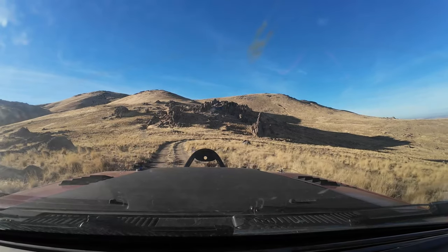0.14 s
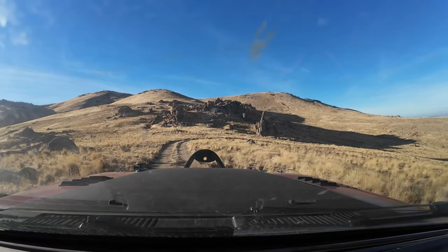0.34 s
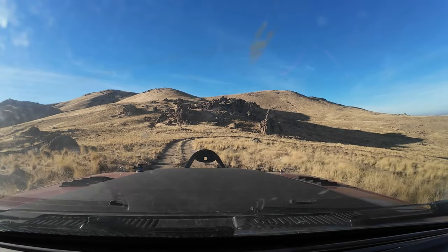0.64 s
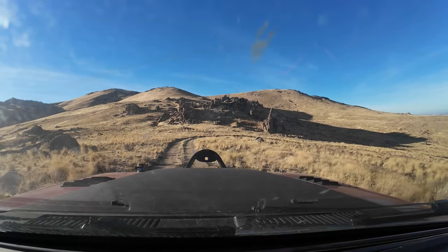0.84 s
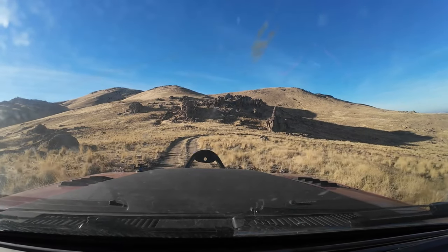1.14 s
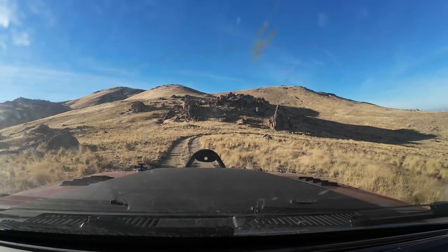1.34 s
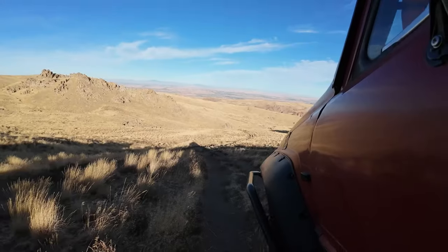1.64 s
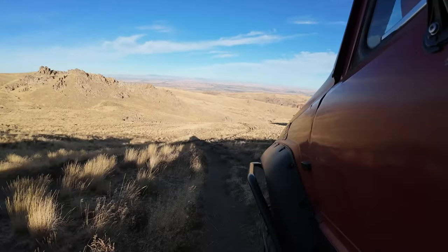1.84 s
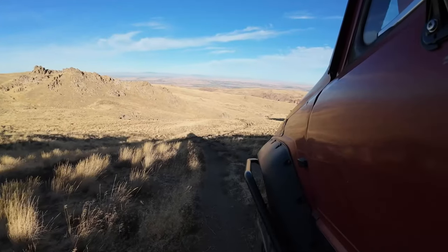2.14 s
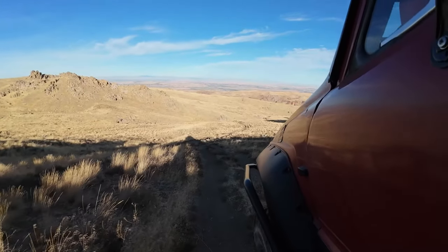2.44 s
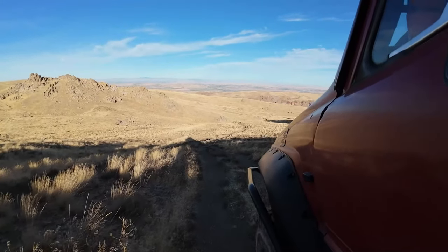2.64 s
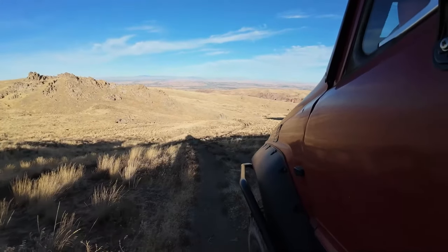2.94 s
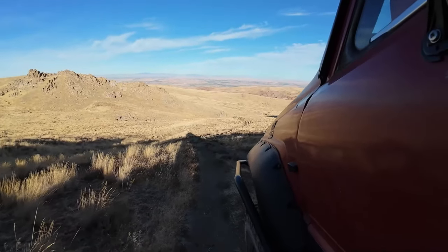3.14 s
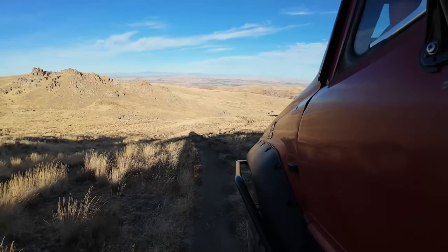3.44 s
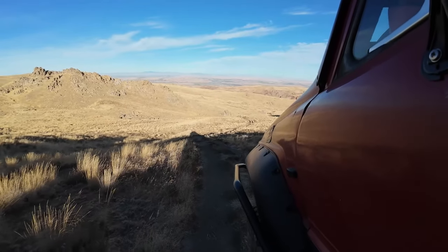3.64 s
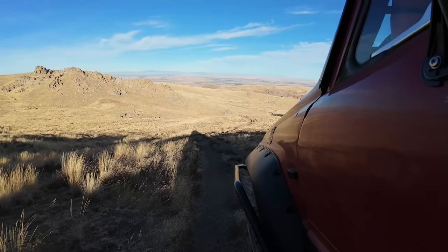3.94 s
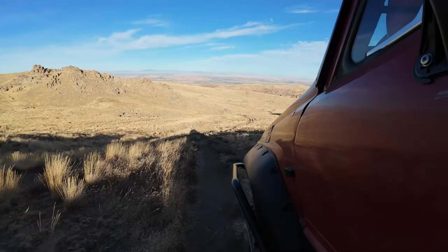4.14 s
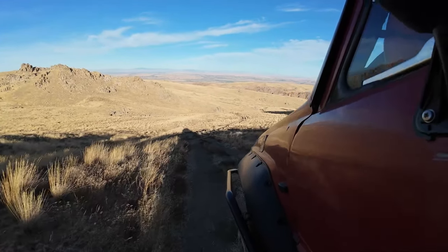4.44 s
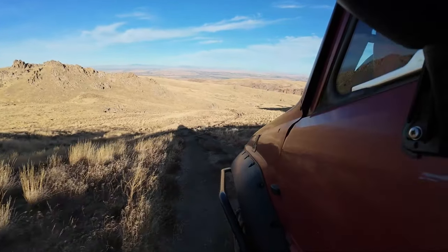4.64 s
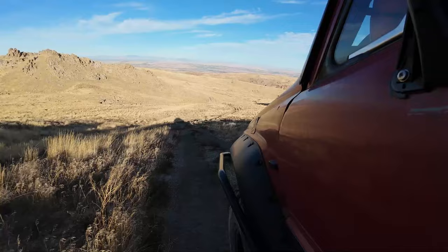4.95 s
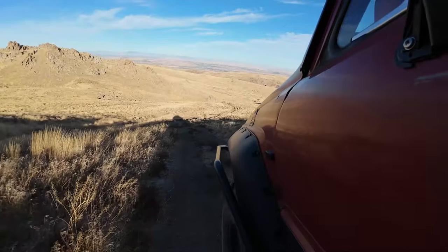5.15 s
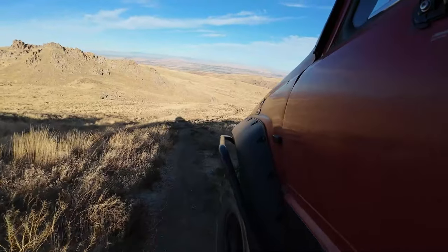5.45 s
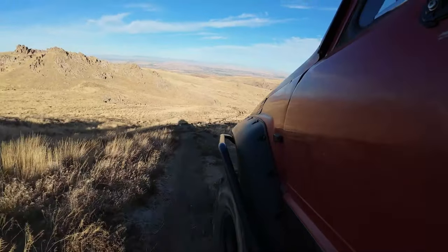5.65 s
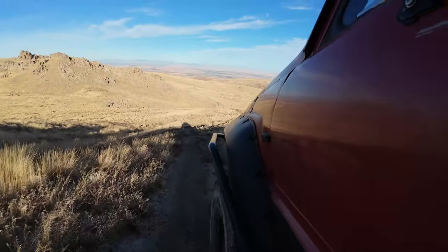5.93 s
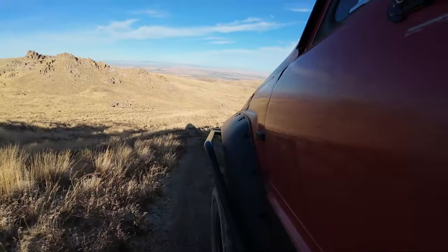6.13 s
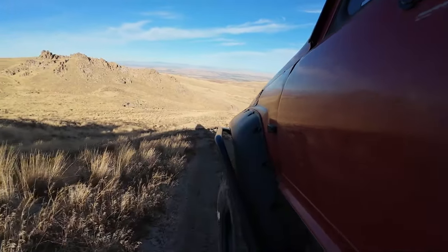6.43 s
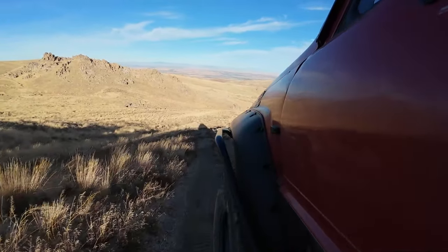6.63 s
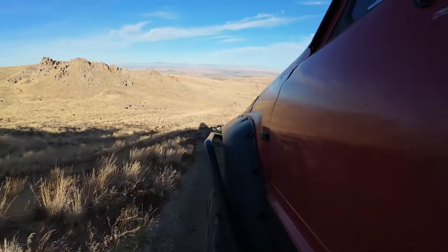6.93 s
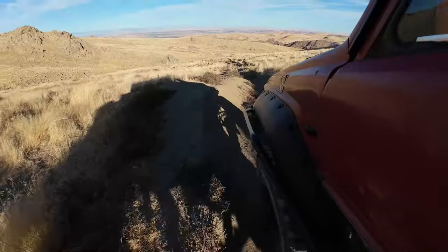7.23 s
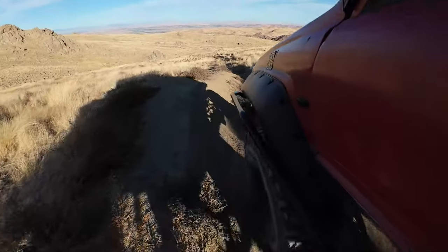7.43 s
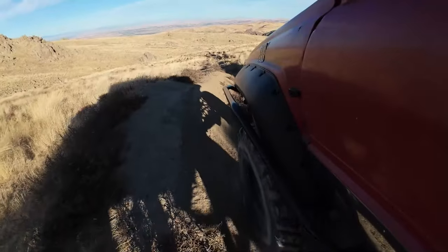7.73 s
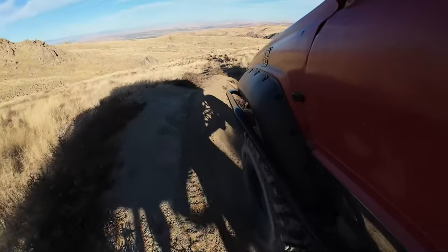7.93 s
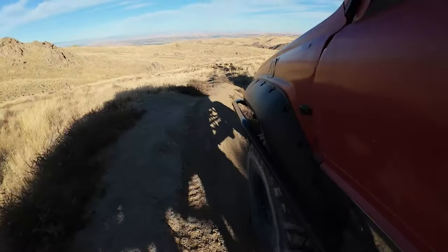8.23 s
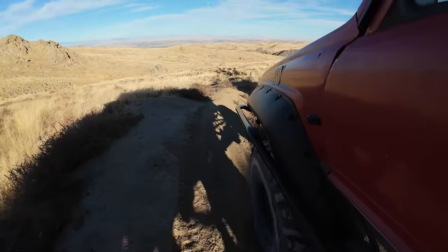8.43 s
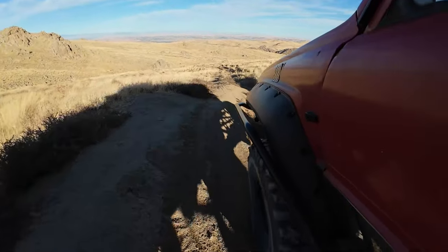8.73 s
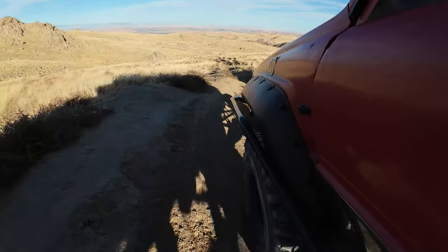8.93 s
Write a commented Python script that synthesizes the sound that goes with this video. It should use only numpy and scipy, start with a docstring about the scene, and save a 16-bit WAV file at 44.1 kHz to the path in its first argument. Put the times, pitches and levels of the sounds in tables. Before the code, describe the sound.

A truck crawls over a dry grassy trail. First a boomy, muffled cab with faint rattling trim, then a sudden open-air view close to the front wheel. Wind flurries roar and slap the microphone, mostly on the left, over low engine hum, whining gears and crunching dirt. The brake squeaks thinly, grass brushes the side, a stone cracks against the body, and the crunch finally grows brighter.

```python
"""First a cab booms at the firing rate of a pickup crawling along a dirt trail, over rumble and hiss, as loose trim ticks.
Then, in two spells outside the door, engine, gears and a low window throb sound as fluttering sinusoids, the engine bay
as throbbing noise. Tyres crunch in clumped noise and snaps; wind is noise in flurries and gusts, with single pressure
pulses at two ports. A brake chirps on one note, dry stalks scrape in sprays of snaps, and stones crack as short bursts
of noise."""
import sys
import numpy as np
from scipy import signal
from scipy.fft import rfft, irfft, next_fast_len
from scipy.io import wavfile
from scipy.ndimage import uniform_filter1d, minimum_filter1d, map_coordinates

SR = 44100
rng = np.random.default_rng(int(sys.argv[2]) if len(sys.argv) > 2 else 0)


def file_out(sig):
    """Save sig as 16-bit WAV at sys.argv[1]."""
    # one column per channel
    cols = np.atleast_2d(sig).T
    # limit, then scale
    lim = np.clip(cols, -1, 1)
    pcm = np.round(lim * 32767).astype(np.int16)
    wavfile.write(sys.argv[1], SR, pcm)


N = 400428


def amp(db):
    """Level: decibels to a pressure ratio."""
    return 10 ** (np.asarray(db) / 20)


def unit(x):
    """Normalisation: scale to rms 1."""
    return x / np.sqrt(np.mean(x ** 2) + 1e-20)


def along(points, hz):
    """Logarithmic frequency: interpolate (f, value) points on a log axis."""
    f, value = np.transpose(points)
    return np.interp(np.log(hz + 1), np.log(f + 1), value)


def curves(rows):
    """Slow variation: one value per sample for each column after the time."""
    s, *columns = np.transpose(rows)
    t = np.arange(N) / SR
    return [np.interp(t, s, column) for column in columns]


def wobble(rate):
    """Random fluctuation: a smooth curve through rate random knots a second."""
    knots = rng.standard_normal(int(N * rate / SR) + 4)
    return map_coordinates(knots, [np.arange(N) * rate / SR])


def filtered(x, response):
    """Linear filtering: multiply the spectrum by a response of frequency."""
    m = next_fast_len(N + SR // 2)
    spectrum = rfft(x, m) * response(np.fft.rfftfreq(m, 1 / SR))
    return irfft(spectrum, m)[..., :N]


def white():
    """Incoherence: two unrelated white noises."""
    return rng.standard_normal((2, N))


# likeness of the left and right microphone ports: (f/Hz, correlation)
PORT_LIKENESS = [(100, .97), (1000, .99), (3000, .94), (5000, .82), (7000, .45), (9500, .3), (11000, -.1),
                 (13000, 0), (15000, -.5)]


def coloured(pair, spectrum, alike=PORT_LIKENESS):
    """Partial coherence: mix two unrelated signals to a stereo sound of rms 1, given spectrum and correlation."""
    def gains(hz):
        turn = np.arccos(np.clip(along(alike, hz), -1, 1)) / 2
        return amp(along(spectrum, hz)) * [np.cos(turn), np.sin(turn)]
    mid, side = filtered(pair, gains)
    return unit(np.array([mid + side, mid - side]))


def bursts(rows, attack):
    """Exponential decay: envelope of (s, dB, t60) blows that swell with time constant attack and die away."""
    env, t = np.zeros(N + SR), np.arange(SR // 2) / SR
    for s, db, t60 in rows:
        env[round(s * SR):][:len(t)] += amp(db - 60 * t / t60) * (1 - np.exp(-t / attack))
    return env[:N]


def swells(rows, shape):
    """Superposition: stereo sum of (s, dB, L-R dB, ...) events, each shape(t, ...) centred on its time."""
    out, t = np.zeros((2, N + SR)), np.arange(-SR // 10, SR // 10) / SR
    for s, db, side_db, *rest in rows:
        gains = amp(db + side_db * np.array([[.5], [-.5]]))
        out[:, round((s + t[0]) * SR):][:, :len(t)] += gains * shape(t, *rest)
    return out[:, :N]


def spell(start, length, edge):
    """Gating: an envelope that rises, holds for the length and falls, with soft edges."""
    t = np.arange(N) / SR - start
    return (np.tanh(t / edge) - np.tanh((t - length) / edge)) / 2


def during(spans, edge):
    """Gating: 1 while one of the (start, end) spans runs."""
    return sum(spell(a, b - a, edge) for a, b in spans)


def angle(hz):
    """Frequency modulation: the running phase of a frequency curve."""
    return 2 * np.pi * np.cumsum(hz) / SR


def partial(phase, rough, rate):
    """Narrow-band modulation: a tone of rms 1 that flutters randomly in level and phase."""
    in_phase = (1 + rough * wobble(rate)) * np.sin(phase)
    return unit(in_phase + rough * wobble(rate) * np.cos(phase))


def orders(firing, table, rough, rate):
    """Additive synthesis: tones at multiples of the firing rate, summed to rms 1."""
    return unit(sum(amp(db) * partial(k * firing, rough, rate) for k, db in table))


def peaks(table, hz):
    """Resonance: gain in dB of (f, width, dB) peaks."""
    return sum(db / (1 + (2 * (hz - centre) / width) ** 2) for centre, width, db in table)


def grains(rate, spread_db):
    """Impulsive noise: sparse random snaps of very unequal size, at rms 1."""
    sizes = amp(spread_db * np.minimum(rng.exponential(size=N), 4))
    return unit((rng.random(N) < rate / SR) * sizes * white())


def patchy(pair, depth_db):
    """Spectro-temporal modulation: random gain patches a few hundred Hz wide and some tens of ms long."""
    z = signal.stft(pair, nperseg=512)[2]
    across_hz = uniform_filter1d(rng.standard_normal(z.shape[1:]), size=5, axis=0)
    field = uniform_filter1d(across_hz, size=9, axis=1)
    return signal.istft(z * amp(depth_db * unit(field)), nperseg=512)[1][:, :N]


# boom at the firing rate, and engine effort as the level of its overtones: (t/s, boom level/dB, effort level/dB)
CAB_LEVELS = [(0, 4.5, -17.5), (.35, -7.5, -29.5), (.55, -6.5, -28.5), (.8, -2, -20.5), (1, -9, -27),
              (1.15, -2, -21.5), (1.3, -12, -29.5), (1.5, -7, -21), (1.61, -8, -18.5)]
# tones in the cab, where 4.75 stands for a cab resonance near 287 Hz: (multiple of firing rate, relative level/dB)
CAB_TONES = [(2, 0), (3, -10), (4, -15), (4.75, -14), (6, -11), (7, -23), (10, -27)]
# air resonances of the cab, which the tones slide through: (f/Hz, width/Hz, gain/dB)
CAB_MODES = [(284, 12, 4), (417, 14, 10)]
# spectra of the drumming panels, road rumble and hiss: (f/Hz, relative density/dB)
PANEL_SPECTRUM = [(90, -9), (170, 5.5), (260, 2.5), (320, 6), (390, -7.5), (450, -15.5), (800, -47)]
ROAD_SPECTRUM = [(10, -40.5), (21, 7), (27, 24), (35, 12), (46, -17.5), (85, -7), (130, -13.5),
                 (215, -25.5), (275, -22.5), (380, -23), (520, -36), (900, -41.5), (2000, -81.5)]
CAB_HISS_SPECTRUM = [(250, -3), (500, 8), (800, 1), (1200, -4.5), (2000, -12.5), (2700, -15.5),
                     (4400, -24.5), (5300, -33), (8500, -43), (10500, -42), (12000, -60), (15000, -63)]
# level of the hiss in the cab: (t/s, level/dB)
CAB_HISS_LEVEL = [(0, -38.5), (.23, -38), (.28, -45), (.4, -41), (.58, -46.5), (.73, -37), (.81, -38),
                  (.87, -37), (1.05, -48), (1.14, -36.5), (1.3, -46), (1.43, -43.5), (1.52, -42),
                  (1.61, -40.5)]
ROAD_DB, PANELS_DB = -9.5, -11  # road rumble; panels relative to the effort curve


def cab(firing):
    """Cavity resonance: air modes colour the overtones, which grow with effort as panels do, by boom, rumble and hiss."""
    boom_db, effort_db = curves(CAB_LEVELS)
    boom = amp(boom_db) * unit(np.sin(firing) * (1 + .11 * wobble(25)))
    tones = orders(firing, CAB_TONES, rough=.3, rate=11)
    overtones = filtered(tones, lambda hz: amp(peaks(CAB_MODES, hz)))
    panels = amp(PANELS_DB) * coloured(white(), PANEL_SPECTRUM)
    road = amp(ROAD_DB) * coloured(white(), ROAD_SPECTRUM, [(25, 0.42), (60, 0.83), (300, 0.86)])
    hiss = amp(curves(CAB_HISS_LEVEL)[0]) * coloured(white(), CAB_HISS_SPECTRUM)
    return boom + amp(effort_db) * (amp(-2.0) * overtones + panels) + road + hiss


# ticks of loose trim: (t/s, relative level/dB)
TICKS = [(0.112, -28), (0.228, -26.5), (0.37, -28), (0.491, -29.5), (0.5673, -48), (0.683, -42.5),
         (0.7742, -35), (0.81, -37.5), (0.926, -30), (0.964, -42.5), (1.2782, -50), (1.318, -44.5),
         (1.454, -47), (1.529, -30.5), (1.539, -40.5), (1.5748, -36.5)]
# ring of the trim: (f/Hz, relative level/dB, t60/s)
TRIM_MODES = [(2760, -12.5, 0.036), (3520, -11, 0.051), (4370, -11, .035), (4600, -5, 0.029),
              (6430, -18, 0.043), (10500, -18.5, 0.03)]
# spells of chatter: (start t/s, length/s, relative level/dB)
RATTLES = [(0.628, 0.17, -59), (0.774, 0.26, -75.5)]
# spectrum of the trim's noise: (f/Hz, relative density/dB)
TRIM_SPECTRUM = [(1500, -32), (3000, -7.5), (3800, -8), (4650, -10.5), (5200, -17), (7000, -14),
                 (8800, -27), (10600, -10.5), (12000, -30.5), (15000, -32)]
CHATTER_DB, RATTLE_EDGE_S = -77, .03  # chatter at rest, before its flutter; rise and fall of a rattle


def trim():
    """Modal excitation: loose plastic chatters and ticks, each tick rings its modes, and the cab answers briefly."""
    t = np.arange(N) / SR
    tick = bursts([(s, db, .013) for s, db in TICKS], attack=.0005)
    ring = 0
    for hz, level, t60 in TRIM_MODES:
        # each tick excites each mode a little differently
        blows = [(s, db + level + rng.standard_normal(), t60) for s, db in TICKS]
        ring = ring + bursts(blows, attack=0.00027) * np.sin(2 * np.pi * hz * t)
    answer = bursts([(s, db, .06) for s, db in TICKS], attack=.0018)
    rattles = sum(amp(db) * spell(s, length, RATTLE_EDGE_S) for s, length, db in RATTLES)
    chatter = (amp(CHATTER_DB) + rattles) * amp(2.3 * wobble(70))
    noise_level = amp(-4) * tick + amp(-23.5) * answer + chatter
    return amp(-4) * ring + noise_level * coloured(white(), TRIM_SPECTRUM)


# low throb and engine outside: (t/s, low throb level/dB, sixth-order hum level/dB, other orders level/dB)
DRONE = [(1.64, -24, -38.5, -37.5), (2.3, -19.5, -37.5, -33.5), (2.75, -34, -41, -31),
         (5.8, -34.5, -38, -31), (7.26, -30, -35.5, -31), (7.3, -32, -32.5, -33), (7.6, -31, -37, -30.5),
         (8.2, -41.5, -34.5, -50.5), (8.55, -39.5, -31.5, -35), (9.08, -41, -34, -32.5)]


def window_throb(firing):
    """Cavity buffeting: a throb at 18 Hz and its harmonics, as of air buffeting an open window, by a weak firing tone."""
    throb_db = curves(DRONE)[0]
    # as multiples of the firing rate: near 18, 36 and 54 Hz, then the firing rate itself
    tones = [(.308, 4), (.616, 4), (.924, 7), (1, -10)]
    return amp(throb_db) * orders(firing, tones, rough=0.26, rate=12)


# level of tyre crunch, dipping briefly under the hardest gusts: (t/s, relative level/dB)
ROLLING = [(1.64, -45), (2.8, -43.5), (3.14, -46), (3.36, -50), (3.53, -44.5), (4.9, -43), (5.6, -41),
           (6.3, -42), (7.26, -42.5), (7.29, -37), (7.9, -38), (8.35, -40), (9.08, -37)]


def crunch_excess():
    """Relative level: how far the crunch level lies above its mean, in dB."""
    crunch_db, = curves(ROLLING)
    return crunch_db - crunch_db.mean()


# engine orders outside: (multiple of the firing rate, relative level/dB)
DOOR_ORDERS = [(2, 0), (2.5, -10), (4.33, -12), (4.9, -9), (5.65, -14), (10.5, -10), (15.2, -17),
               (18.75, -22)]
# the engine pulls harder: (start t/s, length/s, extra engine bay level/dB)
SURGES = [(7.276, 0.18, 3), (7.503, 0.49, 1.5)]
# spectrum of the engine bay: (f/Hz, relative density/dB)
BAY_SPECTRUM = [(60, 9.5), (130, 7.5), (190, -3.5), (270, 2.5), (350, 0), (440, -4.5), (520, -1),
                (592, 1.5), (700, 1), (770, -7.5), (890, 1), (1000, -4.5), (1150, -5.5), (1450, -11),
                (2500, -39.5)]
BAY_DB, BAY_FOLLOWS = -28.5, 0.49  # engine bay at mean crunch outside the surges; its dB for each dB of crunch
SURGE_EDGE_S = 0.031
# the exhaust resonates briefly at twice the firing rate
PIPE_START_S, PIPE_LENGTH_S, PIPE_EDGE_S, PIPE_DB = 8.38, .26, 0.034, -26


def engine(firing):
    """Periodic excitation: engine orders and a pipe resonance, with engine bay noise throbbing at each firing."""
    _, hum_db, tones_db = curves(DRONE)
    surge_db = sum(db * spell(s, length, SURGE_EDGE_S) for s, length, db in SURGES)
    bay_db = BAY_DB + BAY_FOLLOWS * crunch_excess() + surge_db
    hum = amp(hum_db) * partial(6 * firing, rough=.15, rate=10)
    tones = amp(tones_db) * orders(firing, DOOR_ORDERS, rough=0.93, rate=12)
    pipe_level = amp(PIPE_DB) * spell(PIPE_START_S, PIPE_LENGTH_S, PIPE_EDGE_S)
    pipe = pipe_level * partial(2 * firing, rough=0.25, rate=10)
    throb = 1 + .1 * np.sin(firing) + .07 * np.sin(firing / 2)
    bay = unit(throb * coloured(patchy(white(), depth_db=1), BAY_SPECTRUM))
    return hum + tones + pipe + amp(bay_db) * bay


# gear whine: (t/s, f/Hz, relative level/dB)
MESH = [(1.64, 571, -31.5), (2.25, 569, -30.5), (3, 573, -38.5), (3.6, 577, -37), (4.3, 578, -41.5),
        (5.9, 580, -41), (6.55, 582, -37.5), (7.15, 585, -41), (7.35, 590, -35), (7.85, 584, -31),
        (8.2, 579, -36.5), (9.08, 580, -39.5)]
# a second, higher mesh sings briefly under load: (start t/s, length/s, starting f/Hz, level/dB)
SECOND_MESH = [(7.27, 0.6, 626, -34), (8.96, .3, 618, -37)]
SAG_HZ_PER_S, MESH_EDGE_S = 21, 0.02
OCTAVE_DB, OCTAVE_FOLLOWS = -49.5, 1.13  # octave at mean crunch; its dB for each dB of crunch
WHINE_SWAY = 0.52  # depth to which each turn of the crank swells the whine


def gears(firing):
    """Tooth-mesh tones: a note and its octave, the note pulsing with the crank; a second mesh joins and sags."""
    t = np.arange(N) / SR
    mesh_hz, whine_db = curves(MESH)
    mesh = angle(mesh_hz)
    sway = unit(1 + WHINE_SWAY * np.sin(firing / 2))
    whine = amp(whine_db - 1) * sway * partial(mesh, rough=.22, rate=18)
    octave_db = OCTAVE_DB + OCTAVE_FOLLOWS * crunch_excess()
    octave = amp(octave_db) * partial(2 * mesh, rough=.3, rate=14)
    second = 0
    for s, length, hz, db in SECOND_MESH:
        note = partial(angle(hz - SAG_HZ_PER_S * (t - s)), rough=0.15, rate=17)
        second = second + amp(db) * spell(s, length, MESH_EDGE_S) * note
    return whine + octave + second


# patches of loose ground: (start t/s, length/s, extra crunch level/dB, extra grit level/dB)
PATCHES = [(6.208, 0.13, 4.5, 2), (7.026, 0.086, 2.5, 5), (7.746, 0.25, 2, 1.5)]
# spectra of the crunch and the grit: (f/Hz, relative density/dB)
CRUNCH_SPECTRUM = [(710, -23.5), (1200, -8.5), (1270, -10), (1420, -6.5), (1720, -4), (2700, -6),
                   (3230, -11.5), (4300, -12.5), (6220, -23.5), (7000, -25.5), (9100, -54), (15400, -120)]
GRIT_SPECTRUM = [(3500, -42), (5500, -3), (6400, -0.5), (7100, -12.5), (7800, 1), (8700, -0.5), (10500, 3),
                 (11100, -1.5), (12000, -3), (13000, -10), (14500, -15), (15800, -28)]
GRIT_DB, PATCH_EDGE_S = -11, 0.025  # grit relative to the crunch curve; rise and fall of a patch


def tyres():
    """Granular noise: tread crushes dirt in clumped snaps over sliding grit, both louder on loose ground."""
    loose_db = sum(np.outer(extra, spell(s, length, PATCH_EDGE_S)) for s, length, *extra in PATCHES)
    crunch_db, grit_db = curves(ROLLING)[0] + loose_db
    clumps = amp(0.45 * wobble(16) + 0.8 * wobble(70))
    snaps = patchy(white() + 0.36 * grains(rate=1500, spread_db=0.0), depth_db=1.0)
    crunch = coloured(clumps * snaps, CRUNCH_SPECTRUM)
    sliding = white() + .5 * grains(rate=4000, spread_db=-1.0)
    grit = coloured(clumps * sliding, GRIT_SPECTRUM)
    return amp(crunch_db + 1) * crunch + amp(grit_db + GRIT_DB) * grit


# slowly changing breeze under the flurries: (t/s, relative level/dB)
BREEZE = [(1.64, -43), (2.3, -29.5), (2.7, -14), (3.7, -16), (4.3, -16), (5.5, -17), (6.4, -17.5),
          (6.62, -20), (7, -15), (7.3, -22.5), (8.2, -21.5), (9.08, -19)]
# flurries of wind: (start t/s, length/s, relative eddy level/dB, L-R level/dB)
FLURRIES = [(2.734, 0.13, -24, 2), (2.889, 0.083, -21, 9), (2.983, 0.21, -24, 3), (3.14, 0.19, -27, 5.5),
            (3.271, 0.17, -21.5, 5), (3.684, 0.14, -27.5, -4.5), (3.93, 0.22, -21.5, 8),
            (4.183, .22, -20.5, 7.5), (4.417, 0.14, -17.5, 2), (4.866, 0.1, -25, 11.5),
            (5.057, .2, -21.5, 4), (5.275, 0.27, -28.5, 4.5), (5.509, 0.14, -24, 2),
            (5.671, 0.067, -13.5, 1.5), (5.797, 0.055, -21.5, 8), (6.107, 0.076, -29, -7.5),
            (6.349, 0.12, -25, 2), (6.935, 0.2, -24, 0.5), (7.148, 0.4, -31, 8.5), (7.46, 0.091, -24, 3),
            (7.593, 0.24, -24, -6), (7.835, 0.15, -24.5, -3)]
# spectra of the slow buffet and the small eddies: (f/Hz, relative density/dB)
BUFFET_SPECTRUM = [(8, -4.5), (20, 5), (45, -2.5), (80, -10.5), (130, -15), (250, -52), (600, -89.5)]
EDDY_SPECTRUM = [(40, -10), (90, 2.5), (150, 0), (240, -7.5), (420, -20), (700, -32.5), (1400, -41),
                 (3000, -76.5)]
FLURRY_EDGE_S = 0.022  # rise and fall of a flurry
CALM_EDDY_DB, FLURRY_BUFFET_DB = -16, 7  # eddy drive relative to the breeze; buffet relative to the flurry


def wind():
    """Turbulence: flurries over a breeze; slow swells are partly shared by the ports, small eddies hardly at all."""
    breeze = amp(curves(BREEZE)[0]) * amp([[1], [-1]])  # 2 dB stronger on the left
    flurry = 0
    for s, length, db, side_db in FLURRIES:
        gains = amp(db + side_db * np.array([[.5], [-.5]]))
        flurry = flurry + gains * spell(s, length, FLURRY_EDGE_S)
    flurry = flurry * amp(2.2 * wobble(22))
    buffet_level = np.hypot(breeze, amp(FLURRY_BUFFET_DB) * flurry)
    buffet = buffet_level * coloured(white(), BUFFET_SPECTRUM, [(20, 0.43), (60, 0.056), (150, 0.13)])
    swirl = np.hypot(amp(CALM_EDDY_DB) * breeze, flurry)
    # eddies only break loose once the air moves fast enough
    breaking = 1 / (1 + (amp(-34.0) / swirl) ** 2)
    lumps = amp(2.53 * np.array([wobble(60), wobble(60)]))
    eddies = unit(lumps * coloured(white(), EDDY_SPECTRUM, [(100, 0.089)]))
    return buffet + amp(4.0) * swirl * breaking * eddies


# large eddies thump the ports: (t/s, relative level/dB, L-R level/dB)
THUMPS = [(2.6, -17, -12.5), (2.793, -13, 11), (2.853, -5, 8.5), (2.941, -3.5, 2), (3.065, -7, 12),
          (3.206, -9, 6.5), (3.265, -17.5, 3), (3.385, -6, 7), (3.462, -5, 8), (3.495, -4.5, 3.5),
          (3.767, -20.5, 2.5), (3.855, -6.5, 2), (4.008, -12, -0.5), (4.084, -4.5, 3), (4.145, -11, 13),
          (4.283, -8, 10.5), (4.386, -7.5, -7), (4.478, -3.5, 4), (4.508, -17.5, 2), (4.711, -15.5, -15.5),
          (5.13, -6, 5), (5.17, -5.5, 15.5), (5.2, -4.5, 5.5), (5.585, -10.5, 5.5), (5.617, -6.5, 13),
          (5.716, -10.5, 4.5), (5.83, -12.5, 18), (6.14, -13, -12), (6.18, -10.5, -7), (6.32, -11, 11),
          (6.408, -8, 4), (7.037, -21, 16), (7.284, -7, -2), (7.472, -4, -7.5), (7.67, -15, -3),
          (7.72, -12.5, 2.5)]
# mean-scale swing frequency and 1/e half length; spread of the log time scale
THUMP_HZ, THUMP_HALF_S, THUMP_SCATTER = 64.9, 0.0088, 0.22


def thumps():
    """Hydrodynamic pressure: a large eddy is a soft swing of random phase, its length and period stretching together."""
    def swing(t):
        size, turn = rng.standard_normal(2)
        u = t * np.exp(THUMP_SCATTER * size)
        return np.exp(-(u / THUMP_HALF_S) ** 2) * np.cos(2 * np.pi * (THUMP_HZ * u + turn))
    return swells(THUMPS, swing)


# small eddies slap the ports: (t/s, relative level/dB, L-R level/dB)
SLAPS = [(2.852, -4, 6), (2.92, 0, 6), (3.015, -3, 9), (3.067, -2, 9), (3.126, -5, 5), (3.203, 6, 6),
         (3.229, -6, 5), (3.385, 0, 4), (3.768, -7, 13), (3.855, -1, -2), (3.961, -3, 13), (4.005, 4, 12),
         (4.084, -5, 3), (4.387, -3, 4), (5.072, -3, 11), (5.246, -6, 8), (5.617, -7, 8), (6.142, -8, -8),
         (7.283, -5, -1), (7.473, -2, -6), (7.661, -6, -12)]
SLAP_HALF_S, SLAP_SUCTION_S = 0.00078, 0.003  # time scale of the push and of the suction around it


def slaps():
    """Pressure impulse: a small, fast eddy hits the ports as one sharp push, set in a shallow suction."""
    def push(t, half):
        return 1 / np.cosh(t / half)

    def slap(t):
        suction = SLAP_HALF_S / SLAP_SUCTION_S * push(t, SLAP_SUCTION_S)
        return push(t, SLAP_HALF_S) - suction
    return swells(SLAPS, slap)


# sharp gusts: (t/s, standard deviation/s, roar level/dB, L-R level/dB)
GUSTS = [(2.919, 0.0043, -11.5, 5), (2.946, 0.011, -14, 8.5), (3.012, 0.011, -18.5, 7),
         (3.153, 0.0092, -17.5, 12.5), (3.233, 0.0067, -16, -6.5), (3.256, 0.0029, -19.5, -7),
         (3.297, .009, -13, -2.5), (3.332, 0.0036, -11.5, 7.5), (3.372, 0.0045, -20.5, 6.5),
         (3.401, 0.01, -16, 2.5), (3.482, .007, -14, 8.5), (3.963, 0.013, -17.5, 15.5),
         (4.004, 0.0037, -11, 10.5), (4.025, 0.0076, -12, -3), (4.081, 0.0096, -19.5, 4.5),
         (4.098, .005, -20, 11), (4.302, 0.01, -15, -1), (4.313, .01, -13, 7), (4.336, 0.0075, -12, 8),
         (4.363, .005, -21.5, 11), (4.383, 0.0088, -11, 2), (4.452, 0.0058, -15.5, 0),
         (4.489, 0.007, -23, 3.5), (4.504, 0.0048, -16, 12), (4.927, 0.014, -21, 8.5),
         (5.074, .008, -17, 10.5), (5.151, 0.019, -15.5, 4.5), (5.194, 0.013, -17, 3),
         (5.268, .008, -23, 6.5), (5.698, 0.014, -15.5, 10), (5.83, 0.0062, -28.5, 6.5),
         (7.48, 0.01, -12, -5), (7.635, .008, -23, -15), (7.685, .006, -15.5, -13.5),
         (7.759, 0.0063, -20.5, -16), (7.809, 0.0049, -18.5, -8.5)]
# spectra of the roar and the bright front: (f/Hz, relative density/dB)
GUST_SPECTRUM = [(60, -4), (180, 10), (400, 4.5), (750, -11), (1200, -35), (2000, -52), (4000, -69.5)]
FRONT_SPECTRUM = [(100, -8.5), (400, 7), (900, -1.5), (1500, -16), (2300, -25.5), (4500, -57.5)]
FRONT_DB, FRONT_GROWS = 5, 2.2  # bright front of a full-scale gust; its dB for each dB of roar
ROAR_CREST = 1.6  # the roar's peaks round off at this multiple of its rms


def gusts():
    """Nonlinear growth: a gust swells and fades as a ragged roar at the ports; the harder, the brighter."""
    rows = [(s, db, side_db, half) for s, half, db, side_db in GUSTS]
    force = swells(rows, lambda t, half: np.exp(-(t / half) ** 2 / 2))
    roar = unit(np.tanh(coloured(white(), GUST_SPECTRUM, [(100, 0.021)]) / ROAR_CREST))
    front = coloured(white(), FRONT_SPECTRUM, [(100, 0)])
    return force * roar + amp(FRONT_DB) * force ** FRONT_GROWS * front


# brake chirps: (t/s, relative level/dB, half length at half amplitude/s)
SQUEAK = [(3.462, -56, 0.028), (4.452, -51, 0.0037), (4.495, -53, .022), (4.592, -54, 0.02),
          (4.76, -51, .006), (4.825, -43, 0.0069), (4.867, -39.5, 0.019), (4.917, -53, .02),
          (5.159, -50, 0.0086), (5.23, -47, .01), (5.298, -51, 0.056)]


def brake():
    """Friction-driven vibration: a dusty pad touches its disc in short chirps on one slightly wavering note."""
    pitch_hz, t = 6530, np.arange(N) / SR
    note = np.sin(angle(pitch_hz * (1 + 0.0023 * wobble(160))))
    touch = sum(amp(db) / (1 + ((t - s) / half) ** 4) for s, db, half in SQUEAK)
    return amp(0.5) * touch * unit(note)


# dry stalks scraping by: (t/s, relative level/dB, t60/s)
STALKS = [(3.515, -31, .12), (5.364, -27, .26), (5.446, -22, .09), (5.494, -23, .09), (5.514, -12, .03),
          (5.522, -26, .1), (6.19, -39, .19), (6.235, -33, .23), (6.3, -36, .17), (7.372, -27, .21),
          (7.51, -29, .09)]
# spectrum of a scrape: (f/Hz, relative density/dB)
STALK_SPECTRUM = [(600, 4.5), (1500, 2), (2400, 4), (3200, 2.5), (4300, -4), (6000, -7), (7200, -16.5),
                  (10000, -19.5), (12000, -26), (15500, -43)]
STALK_RISE = 0.093  # time constant of a scrape's rise as a share of its t60


def brush():
    """Frictional snapping: dry stalks drag along the side in dense sprays; a long scrape swells slowly."""
    snaps = patchy(white() + grains(rate=2600, spread_db=1.5), depth_db=2)
    spray = coloured(snaps * amp(1.5 * wobble(300)), STALK_SPECTRUM)
    scrapes = sum(bursts([(s, db, t60)], attack=STALK_RISE * t60) for s, db, t60 in STALKS)
    return scrapes * spray


# stones hitting the body: (t/s, relative level/dB, t60/s)
STRIKES = [(6.0706, -4, .056), (6.766, -19, .05), (8.858, -38, .038)]
# spectrum of the crack: (f/Hz, relative density/dB)
STRIKE_SPECTRUM = [(300, 4), (900, 2.5), (2500, -1.5), (4000, -2), (5900, 2.5), (6900, -7), (8000, 0.5),
                   (10400, 6.5), (11300, -8.5), (13000, -3.5), (15500, -32)]


def strikes():
    """Damped impact: a flung stone cracks against the body and hardly rings."""
    crack = coloured(white() + .7 * grains(rate=4900, spread_db=2), STRIKE_SPECTRUM)
    return amp(-8.5) * bursts(STRIKES, attack=0.0013) * crack


# engine speed: (t/s, firing rate f/Hz)
FIRING = [(0, 59), (.3, 59.8), (.6, 60.1), (.8, 61.2), (1.05, 61.3), (1.25, 60.6), (1.5, 63.4),
          (1.61, 63.2), (1.637, 58.2), (5.6, 58.4), (7.1, 58.7), (7.5, 59.5), (8.1, 59.1)]
# spans heard in the cab and outside the door: (start t/s, end t/s)
CAB_SPANS = [(-1, 1.611)]
DOOR_SPANS = [(1.637, 7.268), (7.277, 10)]
CAB_CUT_S, DOOR_CUT_S = .00004, 0.00087  # how abruptly the spans begin and end


def scene():
    """Common excitation: one engine phase, heard from the cab and then from beside the door."""
    firing = angle(curves(FIRING)[0])
    inside = cab(firing) + trim()
    vehicle = window_throb(firing) + engine(firing) + gears(firing) + tyres()
    air = wind() + thumps() + slaps() + gusts()
    contacts = brake() + brush() + strikes()
    outside = vehicle + air + contacts
    return during(CAB_SPANS, CAB_CUT_S) * inside + during(DOOR_SPANS, DOOR_CUT_S) * outside


def limiter(x, ceiling, release_db):
    """Gain reduction: overloads duck both channels at once; the gain comes back by release_db a second."""
    over_db = 20 * np.log10(np.maximum(np.abs(x).max(axis=0) / ceiling, 1))
    ramp = release_db * np.arange(N) / SR
    held_db = np.maximum.accumulate(over_db + ramp) - ramp
    # the centred windows begin each dip before its peak
    lowest = minimum_filter1d(amp(-held_db), size=128)
    return x * uniform_filter1d(lowest, size=128)


# resonances of the microphone housing: (f/Hz, width/Hz, gain/dB)
HOUSING = [(2870, 250, 1.5), (4270, 320, 0.5), (7570, 110, 5), (8030, 120, 0.5), (8900, 110, -0.5),
           (9600, 120, 0.5), (10130, 290, 2.5)]
# balance of the microphone ports: (f/Hz, L-R level/dB)
BALANCE = [(100, 1), (1300, 0), (2500, 1.7), (4600, 4.5), (7000, 1), (10500, 1.2), (11700, -3),
           (14500, 0.5)]
LOW_CUT_HZ, TOP_HZ = 14, 15700


def record(dry):
    """Transduction: the housing and each port colour the sound, a limiter ducks overloads, and the band is limited."""
    def port_gains(hz):
        return amp(peaks(HOUSING, hz) + along(BALANCE, hz) * np.array([[.5], [-.5]]))
    ports = filtered(dry, port_gains)
    held = limiter(ports, ceiling=0.81, release_db=96.5)
    return filtered(held, lambda hz: (hz < TOP_HZ) * hz / np.hypot(hz, LOW_CUT_HZ))


dry = scene()
out = record(dry)
file_out(out)
```